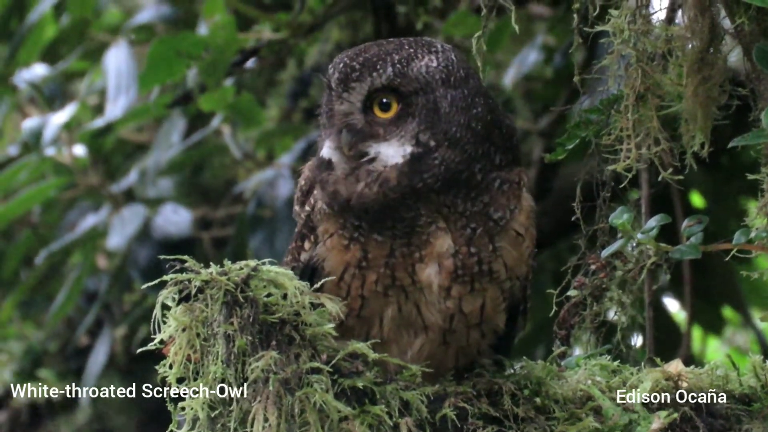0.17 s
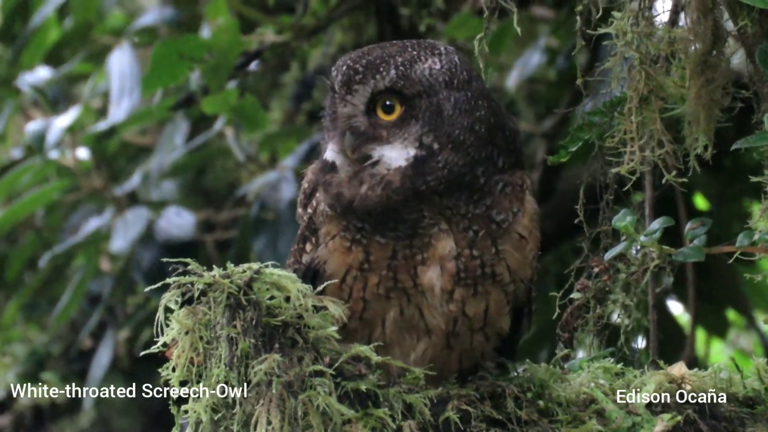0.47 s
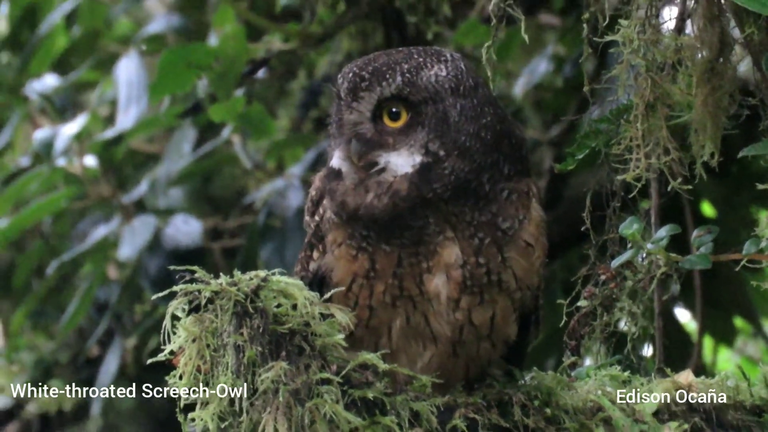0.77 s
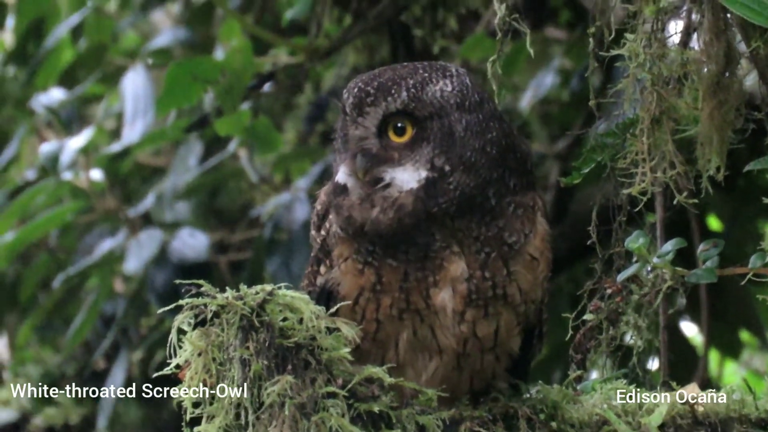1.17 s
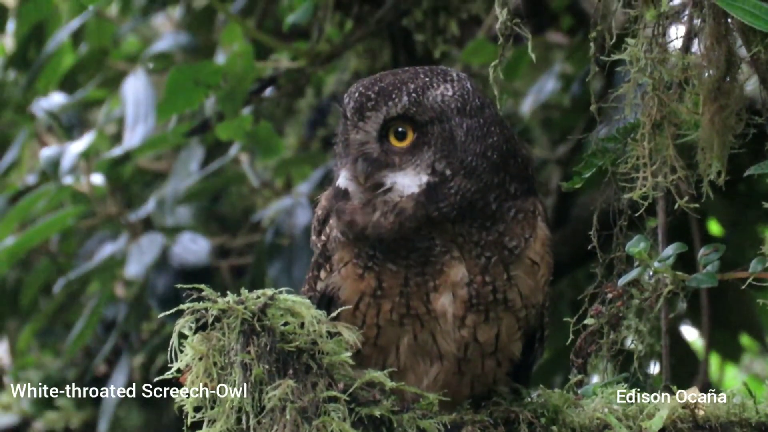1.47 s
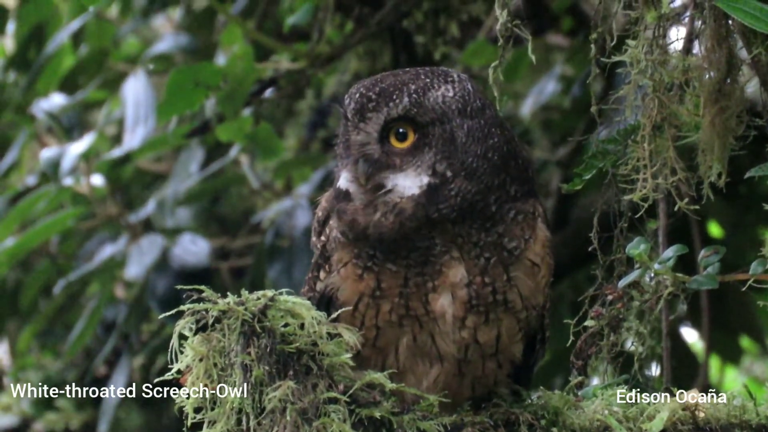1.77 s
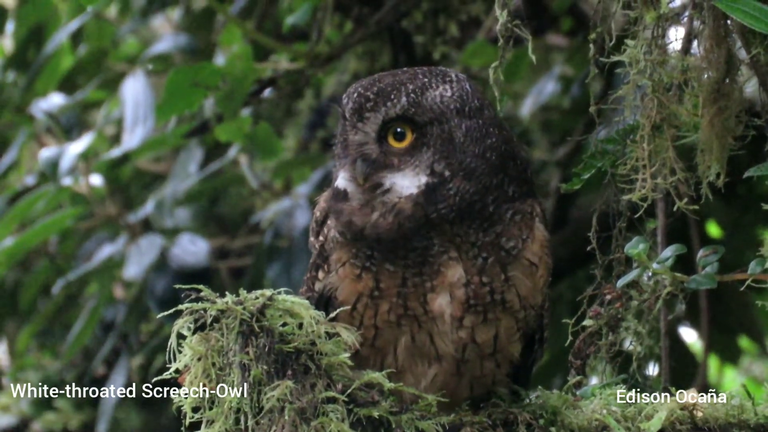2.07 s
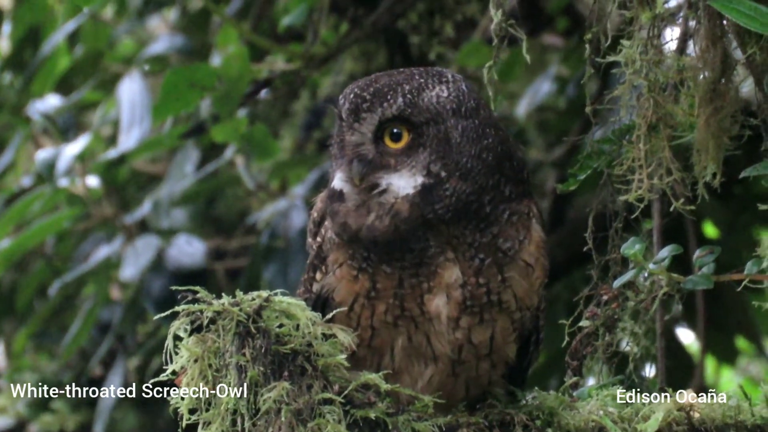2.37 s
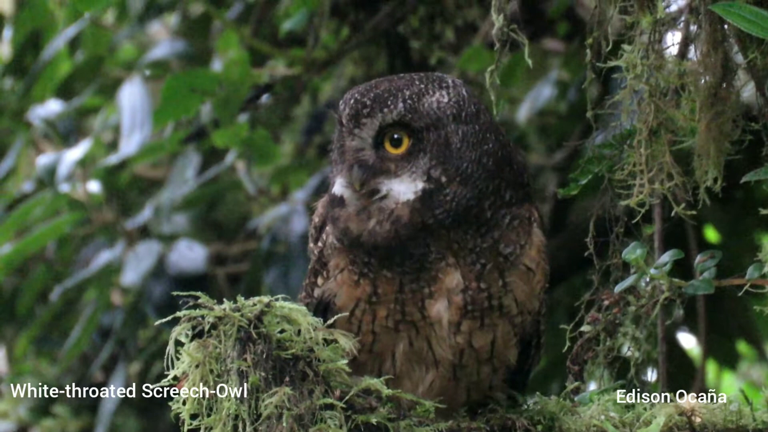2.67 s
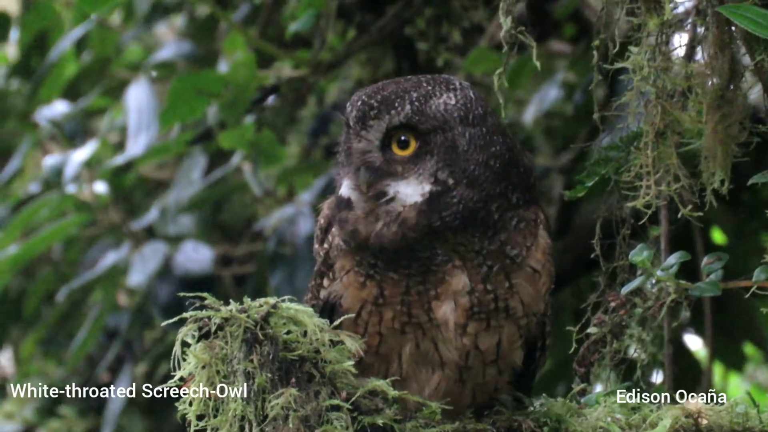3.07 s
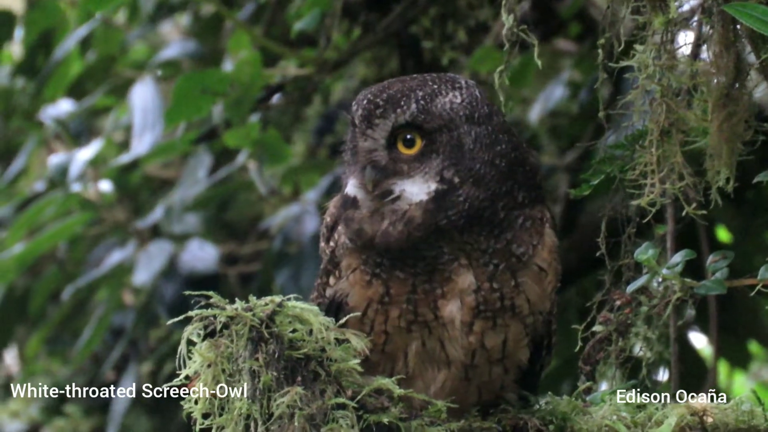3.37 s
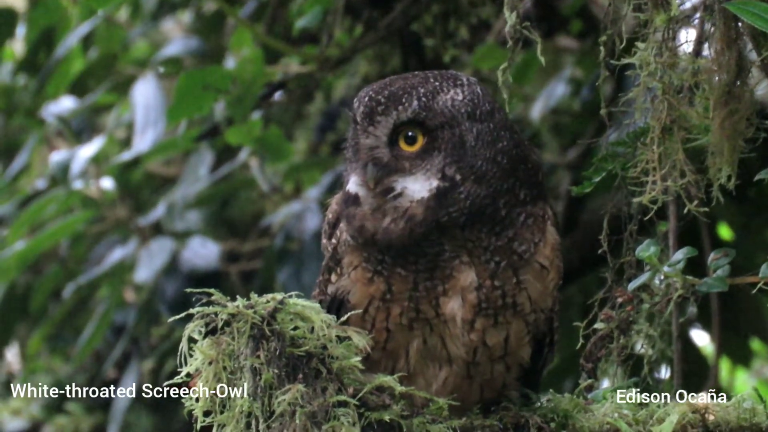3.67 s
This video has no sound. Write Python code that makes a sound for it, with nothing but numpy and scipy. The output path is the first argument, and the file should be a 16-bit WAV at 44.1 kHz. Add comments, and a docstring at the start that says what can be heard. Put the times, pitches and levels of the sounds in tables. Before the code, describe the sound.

A small owl hoots in quick, even pairs, about four a second, swelling early on. Distant birds squeak at first, sharp snaps crack nearby, then light ticks and handling bumps follow over steady forest hiss and rumble.

```python
"""A small owl hoots in quick pairs in a damp forest, its voice swelling as it settles in.
Tiny birds squeak among the trees; sharp snaps, light ticks and soft handling bumps sound close by.
A brief hum lies under them, with a steady hiss and a distant rumble behind.
Hoots, calls, bumps and hum are shaped sine tones; snaps, ticks and air are shaped noise.
Owl, birds, snaps and handling also get scattered echoes."""
import sys
import numpy as np
from scipy import signal
from scipy.fft import rfft, irfft
from scipy.io import wavfile
from scipy.ndimage import uniform_filter1d

SR = 44100
rng = np.random.default_rng(int(sys.argv[2]) if len(sys.argv) > 2 else 0)


def file_out(sig):
    """Save sig as 16-bit WAV at sys.argv[1]."""
    # one column per channel
    cols = np.atleast_2d(sig).T
    # limit, then scale
    lim = np.clip(cols, -1, 1)
    pcm = np.round(lim * 32767).astype(np.int16)
    wavfile.write(sys.argv[1], SR, pcm)


N = 168021

# Hoot pairs. Each row: middle of the first in seconds, gap to the second in seconds,
# top pitch of the first in Hz, level of the first in dB.
HOOT_PAIRS = [(0.011, 0.086, 733.5, -38.5), (0.2463, 0.082, 750.6, -34.8), (0.485, 0.082, 759, -34),
              (0.7332, 0.081, 764.6, -32.5), (0.9818, 0.081, 776, -30.5), (1.2358, 0.078, 784.4, -30),
              (1.4897, 0.079, 789, -29), (1.7479, 0.0808, 793, -29), (2.0082, 0.079, 791, -28.5),
              (2.2689, 0.081, 794, -28.5), (2.5352, 0.079, 794, -28), (2.8024, 0.08, 803, -28),
              (3.0748, 0.08, 797, -27.5), (3.3517, 0.08, 801, -27.5), (3.6307, 0.087, 803, -28)]
# A relaxed hoot's pitch and half-length; higher hoots last longer.
EASY_HZ, EASY_HALF_S, HALF_S_PER_HZ = 728, 0.046, 0.00032
SECOND_EFFORT, SECOND_DB = 0.67, -0.9  # share of the first hoot's lift above EASY_HZ; level change
# Pitch arch: curvature before and after the top, and its floor (shares of the top pitch).
CLIMB, SAG, LOWEST = 0.543, 0.84, 0.77
# Level arch: distance from the middle to half level (share of the half-length), steepness.
SWELL, SWELL_SHAPE = 0.31, 3.24
STOP, STOP_SHAPE = 0.34, 5
HOOT_OVERTONE_DB, HOOT_WAVER, HOOT_TREMOR = -27, 0.0048, 0.096  # waver of pitch, tremor of level (rms shares)
OWL_PAN_DB, OWL_LAG_S, OWL_ECHO_DB = 1.25, 0.000012, -11.5

# Near bird's chips. Each row: start in seconds, length in seconds, start, middle and end pitch in Hz,
# level in dB.
CHIPS = [(2.029, 0.029, 10370, 9140, 9570, -38), (3.2417, 0.0073, 10700, 10530, 8700, -33),
         (3.25, 0.0013, 10300, 5530, 1490, -31.5)]
# Its fast falling zips. Each row: start in seconds, start pitch in Hz, level in dB.
ZIPS = [(2.0565, 11300, -45), (2.068, 11170, -47), (2.08, 11610, -41), (2.109, 12320, -43),
        (2.13, 11930, -46)]
ZIP_FALL, ZIP_LENGTH_S, ZIP_PAN_DB = 0.38, 0.0056, 1.5  # fall as a share of the start pitch
# Near bird's echo, weaker for the last chips. Each row: time in seconds, echo level in dB.
NEAR_ECHO = [(2.1, 3), (3.2, -9.5)]

# Distant squeaks. Each row: start in seconds, length in seconds, start, middle and end pitch in Hz,
# level in dB.
SQUEAKS = [(0.046, 0.055, 6020, 6020, 6000, -46.5), (0.047, 0.044, 7800, 8080, 8170, -52.5),
           (0.075, 0.081, 7800, 8080, 9130, -47), (0.199, 0.09, 8020, 7240, 7100, -46.5),
           (0.362, 0.038, 7200, 6670, 7030, -42.5), (0.496, 0.068, 7300, 7140, 7320, -44.5),
           (0.63, 0.055, 7200, 7120, 6980, -43.5), (0.728, .07, 7170, 6930, 6820, -41.5),
           (0.773, 0.045, 6750, 6695, 6830, -36.5), (0.939, 0.06, 7500, 6950, 6250, -49),
           (1.017, 0.026, 8450, 8250, 7700, -48.5), (1.305, 0.046, 8750, 8180, 7600, -51),
           (1.311, 0.0257, 5430, 5330, 4950, -49)]
# Twitter, flurries of three quick falling sweeps. Each row: time in seconds, start pitch in Hz,
# level in dB.
TWITTER = [(.004, 7600, -50), (.111, 8200, -48.5), (0.23, 8400, -48), (.523, 8400, -46.5),
           (.888, 8750, -49), (1.046, 7730, -52), (1.183, 9200, -48), (1.212, 7900, -49.5),
           (1.37, 8900, -50), (1.41, 7800, -51.5)]
TWITTER_FALL, TWITTER_LENGTH_S = 0.194, 0.0123
TWITTER_SCATTER_S, TWITTER_SPREAD = 0.017, 0.0575  # scale of the stray in time and pitch (share)
# Thin distant piping. Each entry: start in seconds.
PIPING_STARTS = [3.38, 3.506, 3.652]
PIPING_HZ, PIPING_DB, PIPING_LENGTH_S = 3990, -59.5, 0.092
FAR_ECHO_DB = 0.5
WHISTLE_WAVER, WHISTLE_OVERTONE_DB = 0.016, -17
WHISTLE_LATE = 1.12  # above 1, a whistle swells slowly and ends quickly

# Sharp snaps. Each row: start in seconds, level in dB, decay in seconds, ring in Hz.
SNAPS = [(0.5839, -21, 0.0046, 3050), (0.5959, -32, 0.0051, 2920), (0.6098, -20.5, 0.0028, 3800),
         (0.6244, -20.5, 0.003, 2020), (0.7194, -22, 0.0024, 1210)]
# Relative snap spectrum. Each row: frequency in Hz, density in dB per Hz.
SNAP_COLOUR = [(300, -9), (800, -8), (1250, -2.5), (3600, -5.5), (4400, -16), (5500, -6), (7000, -2),
               (8300, -15), (14000, -39)]
SNAP_RING_DB, SNAP_RING_OCTAVES = 4, 0.49
SNAP_BASS_LATE_S, SNAP_SWEEP_HZ = 0.01, 1203  # the lows of a snap arrive after its highs
SNAP_RUSTLE_DB, SNAP_RUSTLE_S = -22, 0.036  # loose crackle after each snap
SNAP_PAN_DB, SNAP_LAG_S, SNAP_ECHO_DB = -3.5, 0.000045, -7

# Light ticks. Each row: start in seconds, level in dB, centre in Hz, decay in seconds.
TICKS = [(0.75, -36, 2300, 0.0016), (2.484, -38, 1740, 0.0013), (3.298, -30.5, 1820, 0.0024),
         (3.642, -39, 955, 0.0036), (3.738, -29.5, 860, 0.0015)]
# Handling bumps. Each row: start in seconds, level in dB, pitch in Hz, twice the rise time in seconds.
BUMPS = [(1.619, -38.5, 106, 0.0082), (2.397, -36, 463, .0025), (2.4255, -36, 610, 0.0023),
         (2.4393, -28, 453, 0.0019), (2.4832, -28.5, 470, 0.0018), (3.403, -30, 244, 0.0032),
         (3.57, -34.5, 600, 0.00096), (3.639, -32, 960, 0.0037)]

# Low hum. Each row: time in seconds, level in dB, pitch in Hz.
HUM = [(.1, -74, 169.6), (.38, -50, 157.8), (0.622, -51.5, 142.3), (1.0, -68, 139.3)]
HUM_OCTAVE_DB, HUM_WAVER = -5, 0.0273

# Relative air spectrum. Each row: frequency in Hz, density in dB per Hz.
AIR = [(20, -36), (40, -23), (70, -4), (150, -1), (250, -2.5), (420, -4), (650, -6.5), (1000, -9.5),
       (2000, -16), (4000, -22), (7000, -27), (10000, -31), (12500, -39), (15500, -45.5)]
# Air width. Each row: frequency in Hz, side minus mid in dB.
AIR_SIDE = [(30, -7), (80, -17.5), (170, -2), (330, 7), (600, 3), (1200, 4.5), (3000, 0.5), (12000, 1)]
# Slow heave of the rumble. Each row: time in seconds, level change in dB.
RUMBLE = [(1.35, -3.5), (1.63, 4.5), (1.8, -5.5), (2.6, -3.5), (2.848, 0), (3.399, -1.5), (3.8, -1)]
AIR_DB, PATCH_DB, LUMP_DB = -43.5, 1.46, -1
RUMBLE_HZ, EDGE_HZ = 230, 15600


def amp(db):
    """Decibels to an amplitude factor."""
    return 10 ** (np.asarray(db) / 20)


def evened(x):
    """Scales to unit rms."""
    return x / np.sqrt(np.mean(x ** 2) + 1e-20)


def read(points, hz):
    """A spectrum joined by straight lines on a log-frequency axis."""
    f, value = np.transpose(points)
    return np.interp(np.log(hz + 1), np.log(f + 1), value)


def add(mix, start_s, sound):
    """Mixes a sound in at its start, trimming what falls outside."""
    at = round(start_s * SR)
    sound = sound[..., max(-at, 0):]
    part = mix[..., max(at, 0):][..., :sound.shape[-1]]
    part += sound[..., :part.shape[-1]]


def drift(n, size):
    """Smoothed noise of about unit rms."""
    noise = rng.standard_normal(n + 8 * size)
    smooth = uniform_filter1d(uniform_filter1d(noise, size), size)
    return evened(smooth)[:n]


def place(x, pan_db, lag_s=0):
    """Mono to stereo: left minus right level, and a delay at the left ear."""
    delay = np.exp(-2j * np.pi * np.fft.rfftfreq(len(x), 1 / SR) * lag_s)
    left = irfft(rfft(x) * delay, len(x))
    return np.array([left * amp(pan_db / 2), x * amp(-pan_db / 2)])


def forest(x, t60, gap_s):
    """Scattered echoes from trunks and leaves, different at each ear."""
    t = np.arange(SR) / SR
    taps = rng.standard_normal((2, SR)) * (rng.random((2, SR)) < 0.05)
    taps *= amp(-60 * t / t60) * np.minimum(t / gap_s, 1)
    taps /= np.linalg.norm(taps, axis=1, keepdims=True)
    return signal.fftconvolve(x, taps, axes=1)[:, :N]


def hoot(top_hz, db):
    """A nearly pure tone that arches in pitch, swells and stops quickly; its top is at its middle."""
    half_s = EASY_HALF_S + HALF_S_PER_HZ * (top_hz - EASY_HZ)
    u = np.arange(-half_s, half_s, 1 / SR) / half_s
    waver = drift(SR // 4, size=150)[:len(u)]
    tremor = drift(SR // 4, size=150)[:len(u)]
    arch = np.maximum(1 - np.where(u < 0, CLIMB, SAG) * u ** 2, LOWEST)
    hz = top_hz * arch * (1 + HOOT_WAVER * waver)
    phase = 2 * np.pi * np.cumsum(hz) / SR
    drop = np.where(u < 0, abs(u / SWELL) ** SWELL_SHAPE, abs(u / STOP) ** STOP_SHAPE)
    level = (1 + HOOT_TREMOR * tremor) / (1 + drop)
    level = level * np.minimum(2 * (1 - abs(u)), 1)  # silent at both ends
    return amp(db) * level * (np.sin(phase) + amp(HOOT_OVERTONE_DB) * np.sin(2 * phase))


def owl():
    """Pairs of hoots, the second a little lower, shorter and softer than the first."""
    out = np.zeros(N)
    for middle_s, gap_s, hz, db in HOOT_PAIRS:
        first = hoot(hz, db)
        second = hoot(EASY_HZ + SECOND_EFFORT * (hz - EASY_HZ), db + SECOND_DB)
        add(out, middle_s - len(first) / SR / 2, first)
        add(out, middle_s + gap_s - len(second) / SR / 2, second)
    dry = place(out, OWL_PAN_DB, OWL_LAG_S)
    return dry + amp(OWL_ECHO_DB) * forest(dry, t60=0.42, gap_s=0.012)


def whistle(length_s, pitches_hz, db):
    """A thin wavering whistle gliding through the given pitches, with an octave on its lower notes."""
    u = np.arange(0, length_s, 1 / SR) / length_s
    count = len(pitches_hz)
    glide = np.polyfit(np.linspace(0, 1, count), pitches_hz, count - 1)
    hz = np.polyval(glide, u) * (1 + WHISTLE_WAVER * drift(SR // 4, size=60)[:len(u)])
    phase = 2 * np.pi * np.cumsum(hz) / SR
    octave = amp(WHISTLE_OVERTONE_DB) * (hz < 6300) * np.sin(2 * phase)
    return amp(db) * np.sin(np.pi * u ** WHISTLE_LATE) * (np.sin(phase) + octave)


def near_bird():
    """Whistled chips and falling zips, slightly louder on the left, with a short spray of echoes."""
    out = np.zeros(N)
    for start_s, length_s, *pitches_hz, db in CHIPS:
        add(out, start_s, whistle(length_s, pitches_hz, db))
    for start_s, hz, db in ZIPS:
        add(out, start_s, whistle(ZIP_LENGTH_S, [hz, hz * (1 - ZIP_FALL)], db))
    dry = place(out, ZIP_PAN_DB, lag_s=0.00002)
    echo_db = np.interp(np.arange(N) / SR, *np.transpose(NEAR_ECHO))
    return dry + forest(dry * amp(echo_db), t60=0.2, gap_s=0.004)


def far_birds():
    """Gliding squeaks, scattered twitter and steady piping, echoed by the trees."""
    out = np.zeros(N)
    for start_s, length_s, *pitches_hz, db in SQUEAKS:
        add(out, start_s, whistle(length_s, pitches_hz, db))
    for start_s, hz, db in TWITTER:
        for late, height in rng.uniform(-1.1, 1, size=(3, 2)):
            top_hz = hz * (1 + TWITTER_SPREAD * height)
            sweep = whistle(TWITTER_LENGTH_S, [top_hz, top_hz * (1 - TWITTER_FALL)], db)
            add(out, start_s + TWITTER_SCATTER_S * late, sweep)
    t = np.arange(0, PIPING_LENGTH_S, 1 / SR)
    pipe = np.sin(np.pi * t / PIPING_LENGTH_S) * np.sin(2 * np.pi * PIPING_HZ * t)
    for start_s in PIPING_STARTS:
        add(out, start_s, amp(PIPING_DB) * pipe)
    dry = np.array([out, out])
    return dry + amp(FAR_ECHO_DB) * forest(dry, t60=0.48, gap_s=0.0075)


def snaps():
    """Dry noise cracks that sweep down from treble to a low knock, each trailed by loose crackle."""
    out, t = np.zeros(N), np.arange(SR // 8) / SR
    hz = np.fft.rfftfreq(len(t), 1 / SR)
    late_s = SNAP_BASS_LATE_S / (1 + (hz / SNAP_SWEEP_HZ) ** 2)
    sweep = np.exp(-2j * np.pi * np.cumsum(late_s) * hz[1])  # phase is the summed group delay
    for start_s, db, decay_s, ring_hz in SNAPS:
        ring = np.exp(-(np.log2((hz + 1) / ring_hz) / SNAP_RING_OCTAVES) ** 2)
        colour = evened(amp(read(SNAP_COLOUR, hz) + SNAP_RING_DB * ring))
        crack = rng.standard_normal(len(t)) * np.minimum(t / 0.0013, 1) * np.exp(-t / decay_s)
        grains = rng.standard_normal(len(t)) * (rng.random(len(t)) < 500 / SR)  # about 500 a second
        rustle = evened(grains) * np.exp(-t / SNAP_RUSTLE_S)
        spectrum = rfft(crack + amp(SNAP_RUSTLE_DB) * rustle) * colour * sweep
        add(out, start_s, amp(db) * irfft(spectrum, len(t)))
    dry = place(out, SNAP_PAN_DB, SNAP_LAG_S)
    return dry + amp(SNAP_ECHO_DB) * forest(dry, t60=0.082, gap_s=0.0028)


def burst(decay_s):
    """A puff of noise that starts at once and dies away."""
    t = np.arange(SR // 16) / SR
    return rng.standard_normal(len(t)) * np.exp(-t / decay_s)


def handling():
    """Ticks of band-passed noise and soft bumps of damped sine, louder on the left."""
    out, t = np.zeros(N), np.arange(SR // 8) / SR
    for start_s, db, hz, decay_s in TICKS:
        band = signal.butter(2, [hz / 2, min(hz * 2, SR / 3)], "band", fs=SR)
        gain = amp(db) * np.sqrt(SR / hz) / np.pi  # makes up for the narrower low bands
        add(out, start_s, gain * signal.lfilter(*band, burst(decay_s)))
    for start_s, db, hz, decay_s in BUMPS:
        pulse = 2 * t / decay_s * np.exp(1 - 2 * t / decay_s)
        add(out, start_s, amp(db) * np.sin(2 * np.pi * hz * t) * pulse)
    dry = place(out, pan_db=4.5)
    return dry + amp(-6) * forest(dry, t60=0.12, gap_s=0.0019)


def hum():
    """A faint wavering tone and its octave that swells, sinks in pitch and fades."""
    time_s, db, hz = np.transpose(HUM)
    t = np.arange(N) / SR
    pitch_hz = np.interp(t, time_s, hz) * (1 + HUM_WAVER * drift(N, size=600))
    phase = 2 * np.pi * np.cumsum(pitch_hz) / SR
    return amp(np.interp(t, time_s, db)) * (np.sin(phase) + amp(HUM_OCTAVE_DB) * np.sin(2 * phase))


def air():
    """Wide forest hiss with faint patches, over a lumpy, slowly heaving rumble: noise shaped by STFT."""
    frames, hz = N // 512 + 5, np.fft.rfftfreq(2048, 1 / SR)
    a, b, c, d, patches = rng.standard_normal((frames, len(hz), 5)).T  # each is frequency by frame
    patches = evened(uniform_filter1d(uniform_filter1d(patches, 20, 0), 7, 1))
    heave_db = np.interp(np.arange(frames) * 512 / SR, *np.transpose(RUMBLE))
    heave_db = heave_db + LUMP_DB * drift(frames, size=4)
    rumble_db = heave_db / (1 + (hz[:, None] / RUMBLE_HZ) ** 4)  # only the lows heave
    side = amp(read(AIR_SIDE, hz))[:, None]
    mid_noise, side_noise = a + 1j * b, side * (c + 1j * d)
    z = np.array([mid_noise + side_noise, mid_noise - side_noise]) / np.sqrt(1 + side ** 2)
    z *= amp(read(AIR, hz)[:, None] + PATCH_DB * patches + rumble_db)
    return amp(AIR_DB) * evened(signal.istft(z, nperseg=2048, noverlap=1536)[1][:, :N])


def scene():
    """All the sources together."""
    return owl() + near_bird() + far_birds() + snaps() + handling() + hum() + air()


def record(dry):
    """The recorder's band limit: a steep linear-phase low-pass."""
    lowpass = signal.firwin(511, EDGE_HZ, window=("kaiser", 9), fs=SR)
    return signal.oaconvolve(dry, lowpass[None], "same")


dry = scene()
out = record(dry)
file_out(out)
```